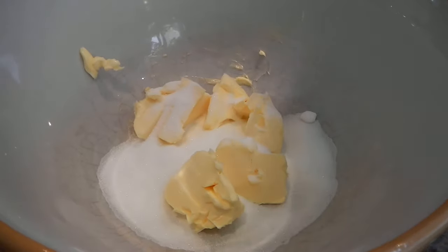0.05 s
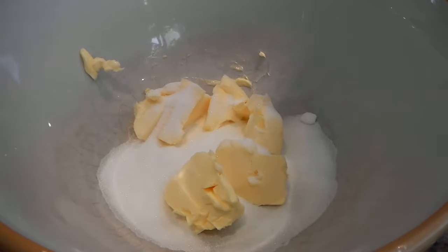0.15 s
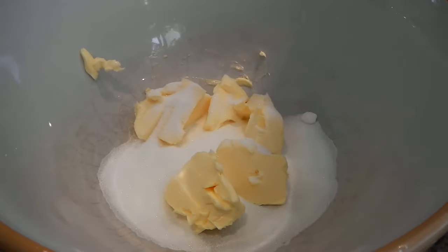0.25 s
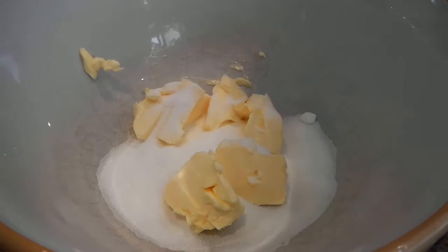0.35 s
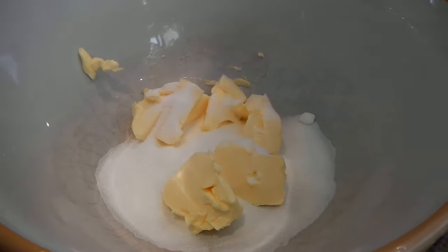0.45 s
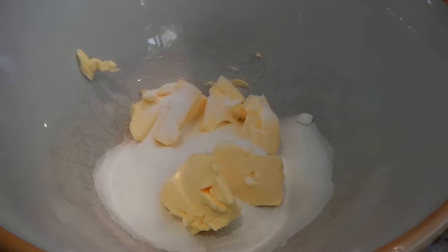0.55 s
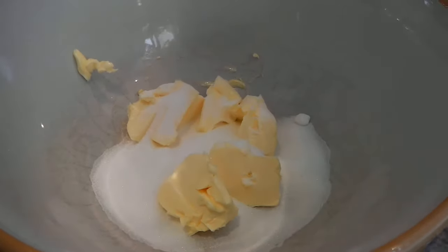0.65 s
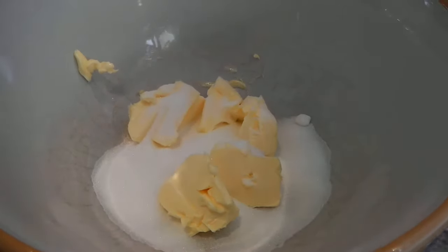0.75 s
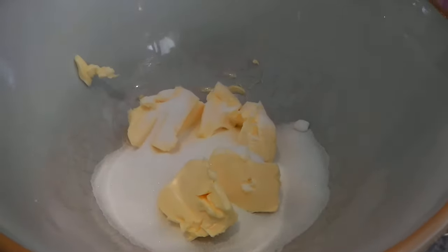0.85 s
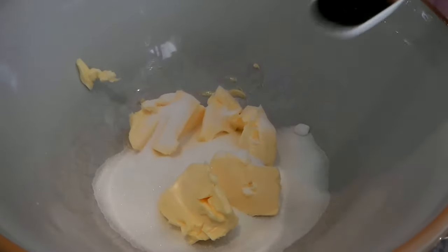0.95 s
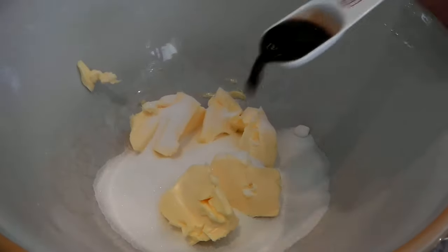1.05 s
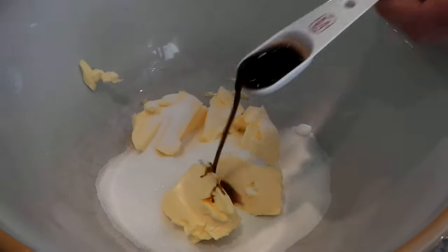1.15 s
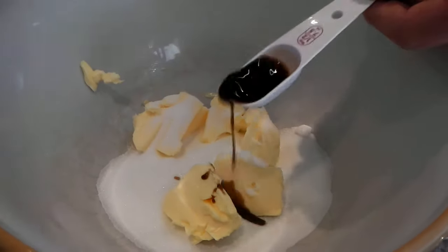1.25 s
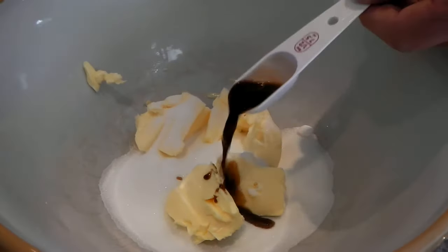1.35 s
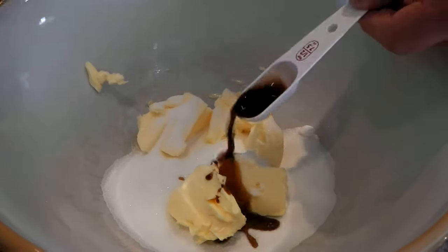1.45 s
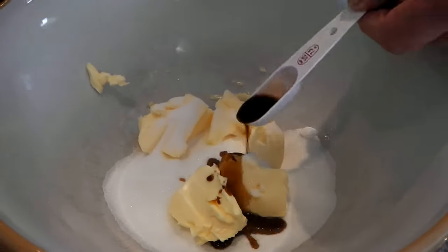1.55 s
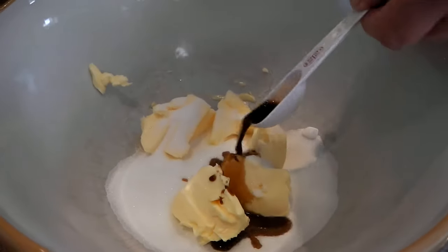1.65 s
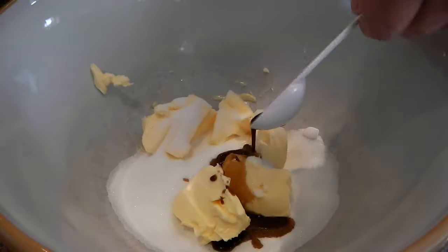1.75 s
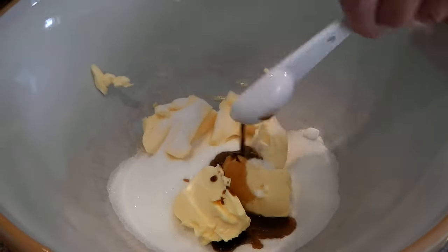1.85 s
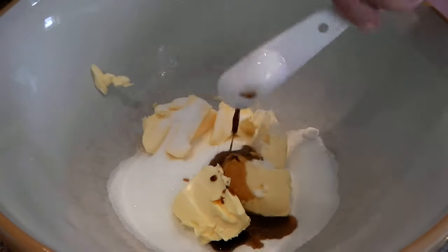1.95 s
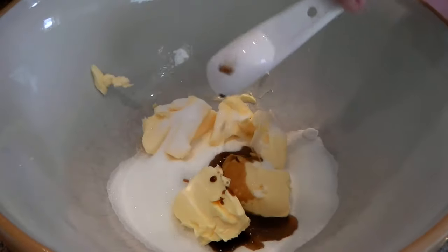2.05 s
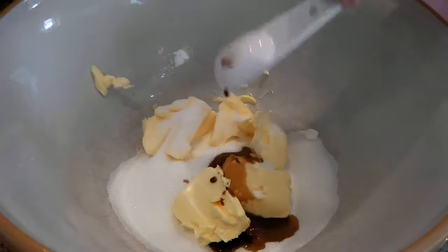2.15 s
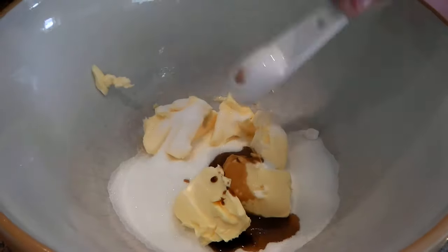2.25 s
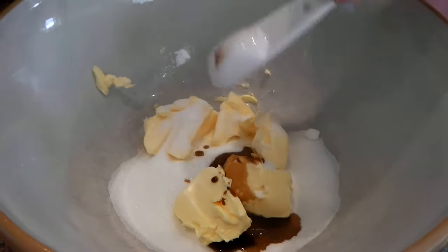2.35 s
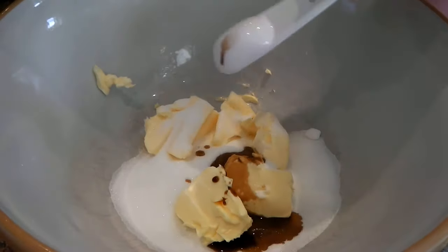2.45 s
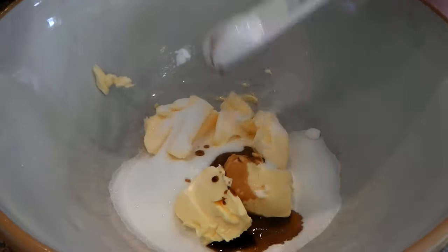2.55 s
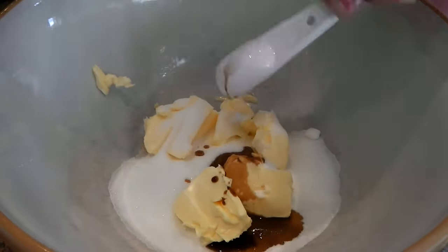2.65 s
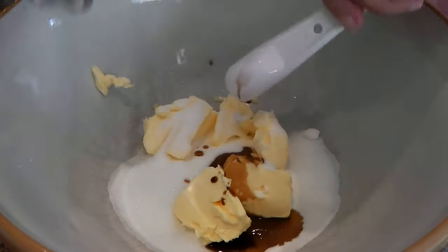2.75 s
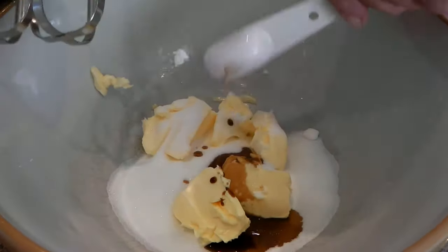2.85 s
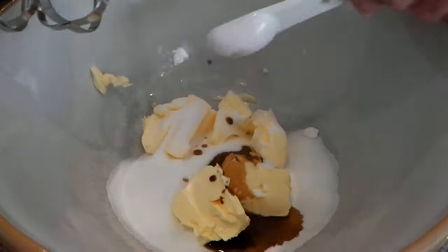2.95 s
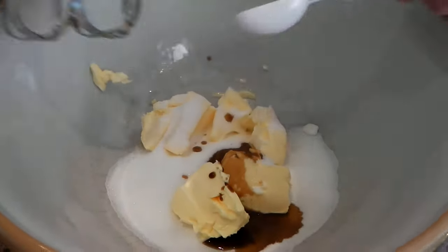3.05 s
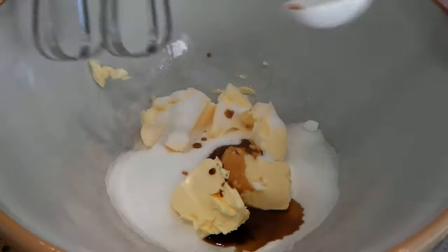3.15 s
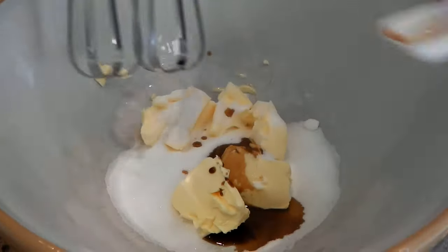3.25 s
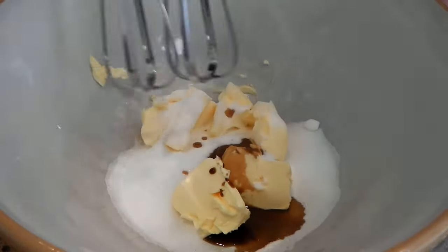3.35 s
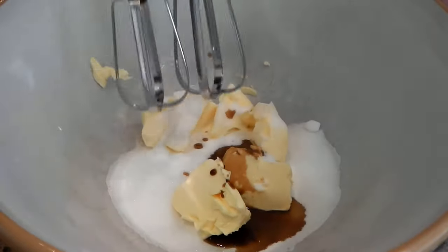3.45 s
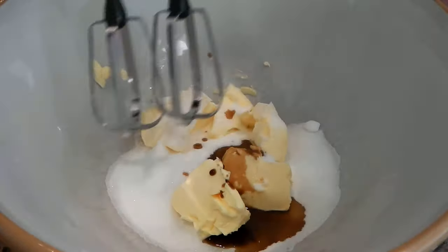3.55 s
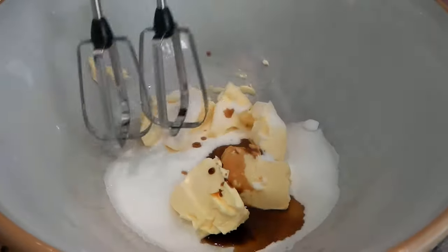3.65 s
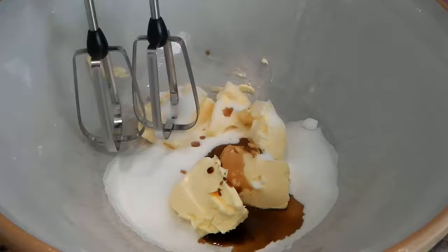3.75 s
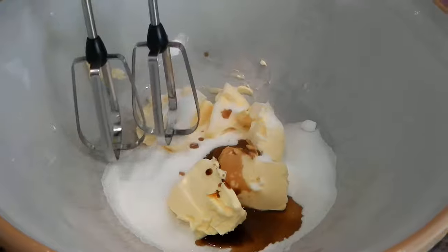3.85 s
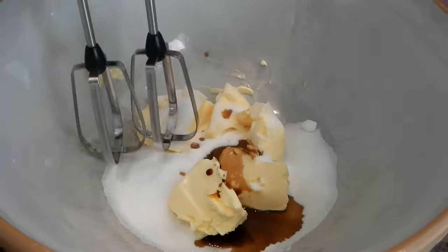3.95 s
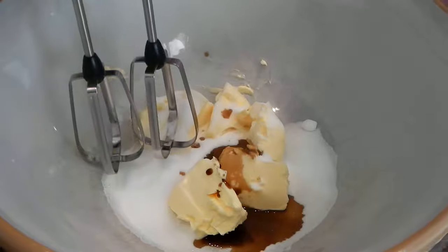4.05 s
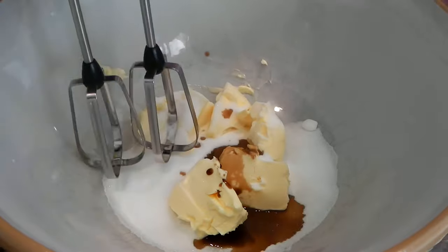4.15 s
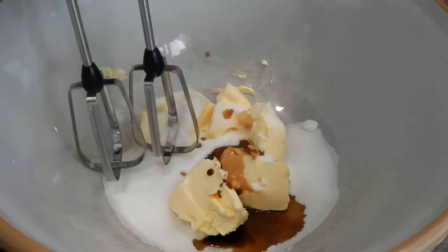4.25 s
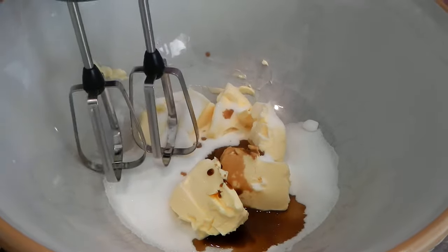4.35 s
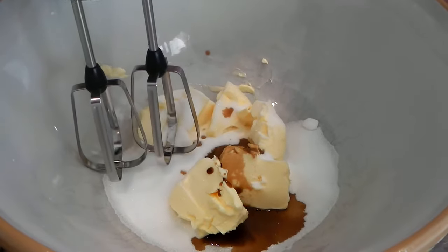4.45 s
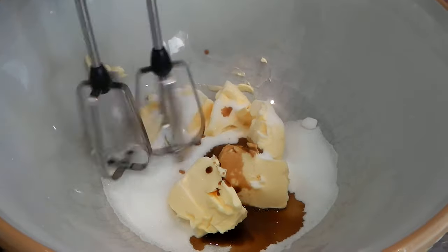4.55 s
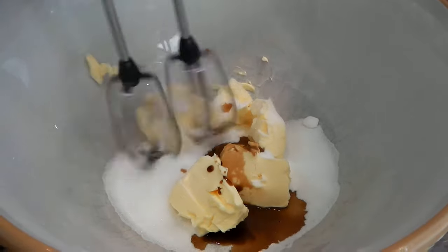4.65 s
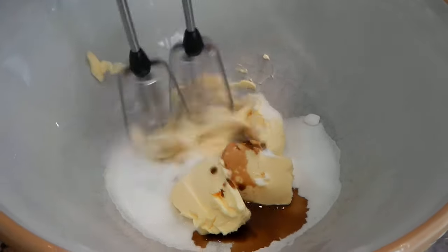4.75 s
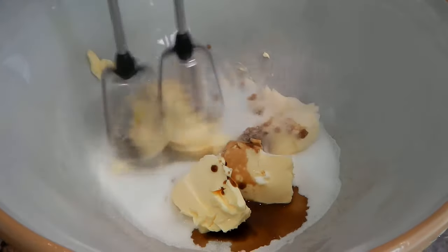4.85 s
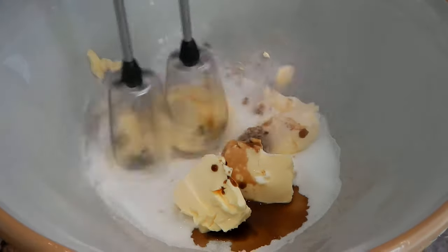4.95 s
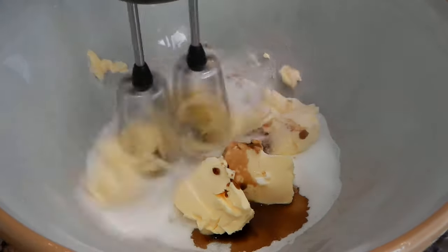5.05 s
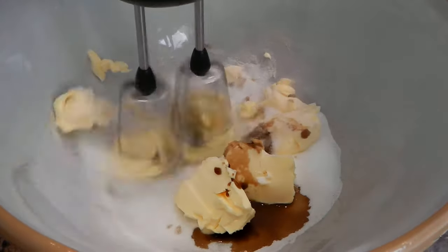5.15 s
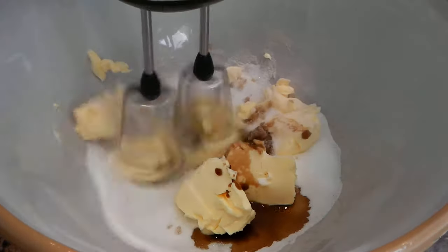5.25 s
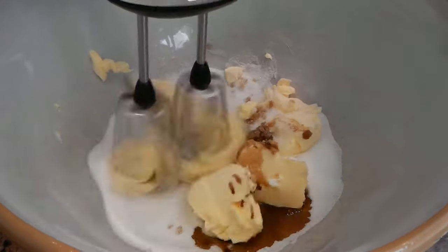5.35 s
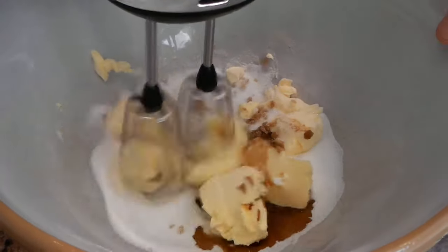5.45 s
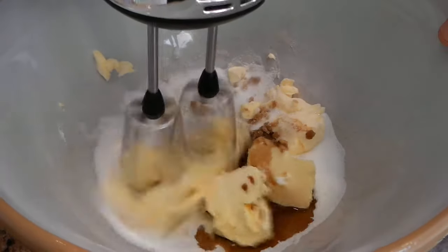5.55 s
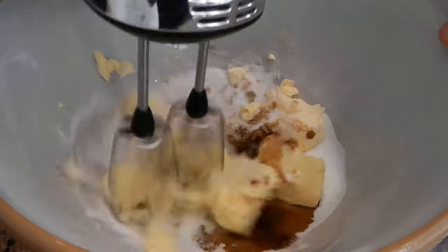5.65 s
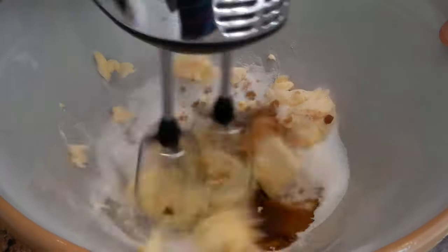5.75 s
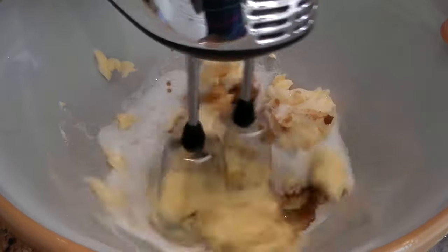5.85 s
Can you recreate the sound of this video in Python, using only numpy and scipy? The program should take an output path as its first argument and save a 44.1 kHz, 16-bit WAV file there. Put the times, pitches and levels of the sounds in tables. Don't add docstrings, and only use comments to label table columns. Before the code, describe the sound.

Light spoon taps, sleeve rustles and faint focus blips, then beaters clank in a ringing ceramic bowl before a hand mixer whines up and churns.

```python
import sys
import numpy as np
from scipy import signal
from scipy.fft import rfft, irfft, next_fast_len
from scipy.io import wavfile

SR = 44100
rng = np.random.default_rng(int(sys.argv[2]) if len(sys.argv) > 2 else 0)


def volts(x):
    e = np.asarray(x, float) / 20
    return 10 ** e


def master(y):
    cut = np.clip(np.atleast_2d(y).T, -1, 1)
    pcm = np.round(cut * 32767)
    wavfile.write(sys.argv[1], SR, pcm.astype(np.int16))


N = 260190

T = np.arange(N) / SR
RING = np.arange(12000) / SR
START = int(4.4 * SR)
SIZE = 2 ** 18
HZ = np.fft.rfftfreq(SIZE, 1 / SR)
SIDES = np.array([[.5], [-.5]])
ON_S, BREAK_FREE_S, BITE_S, OVERTONES_S = 4.47, 4.497, 4.755, 4.535
FREE_SPEED, SPEED_GAP, SPIN_UP_S = 226, 181, .2
BARS, MAINS_BEAT_HZ = 12, 100
FRAME_S, HUNT_FRAMES = 1 / 29.97, 97

# frequency in Hz, level in dB per Hz.
HOUSING_COLOUR = [(120, -49), (200, -12.5), (270, -25), (400, -9.5), (680, -8), (1100, -3), (1500, -4),
                  (1900, -9), (2400, -4.5), (3000, -6.5), (3500, -8.5), (5200, -8), (6500, -16),
                  (8000, -34), (10000, -45)]
# frequency in Hz, level in dB per Hz.
AIR_COLOUR = [(3240, -20), (5500, -6), (5930, -3.5), (7320, -7), (7970, -9), (8990, 3.5), (9980, -4),
              (10900, -2.5), (11400, -5), (12500, -6), (13800, -4), (16000, -6.5)]
# frequency in Hz, level in dB per Hz.
CHURN_COLOUR = [(20, -34.5), (45, -7.5), (82, 2), (139, -1), (172, -6.5), (254, -13), (400, -6),
                (600, -10.5), (900, -46)]
GEAR_ORDERS = 2, 3, 5, 6, 7, 9, 14, 18, 20, 28, 30, 32
GEAR_DB = [17, 19.5, 17.6, 17.6, 18.5, 24.7, 24, 20, 21, 16, 12, 11]
FAN_ORDERS = 34, 38, 40, 41, 43, 44, 47, 49, 52, 53, 55
FAN_DB = [23, 22, 17, 20, 21, 19, 18, 18, 20, 21, 19]
SIDEBANDS_DB = [-23, -3.5, 0.5, -0.5, -9.5]
OVERTONE_ORDERS = 24, 36
OVERTONE_DB = [1.6, -7]
UPPER_ORDERS = 48, 60, 72
UPPER_DB = [-5.5, -7, -3.5]
TOP_ORDERS = 84, 96
TOP_DB = [-11, -7]
# frequency in Hz, gain in dB.
VENTS = [(2000, 4), (5000, -2.5), (7000, 2.5), (9000, 4), (10600, 1), (11700, 1), (12300, -10), (13300, -7),
         (14000, 3), (15600, -1), (16200, -40)]
# frequency in Hz, likeness from -1 to 1.
SAME = [(60, 0.91), (130, 0.95), (290, 0.95), (640, 0.95), (1410, 1), (3100, 0.6), (6820, -0.023),
        (15000, -0.24)]
# frequency in Hz, likeness from -1 to 1.
MOTOR_SAME = [(60, 0.51), (130, 0.83), (290, 0.93), (640, 0.97), (1410, 0.99), (2400, 0.96), (4400, 0.63),
              (8000, 0.3), (15000, 0.5)]
# frequency in Hz, left over right in dB.
LEAN = [(60, -1), (180, 0.5), (550, -1), (1650, 0), (4970, -2), (15000, -3.5)]
# frequency in Hz, lead in radians.
LEFT_LEAD = [(1500, 0), (2670, -0.64), (4570, -0.5), (7240, 0.5), (8960, 0.9), (9600, 0.4), (11500, 3),
             (13700, 1.5), (16000, 1.5)]
# time in seconds, speed lost in turns
DRAG = [(4.62, 2.9), (4.68, 8.2), (4.73, 9.8), (4.765, 8.4), (4.85, 10.8), (4.9, 8.1), (4.97, 13.4),
        (5.03, 10.2), (5.075, 10.2), (5.13, 6.6), (5.23, 3.9), (5.47, 1.8), (5.72, 5.5), (5.78, 9.5),
        (5.84, 12), (5.9, 9)]
# peak in seconds, dB over running level, rise and 20 dB fade in seconds.
SURGES = [
    (4.47, 26.5, 0.0052, 0.0182),
    (4.501, 4, 0.092, 0.28),
    (4.54, 5, 0.59, 0.1),
]
# time in seconds, churning level in dB.
DEPTH = [
    (4.47, -54),
    (4.79, -54),
    (4.835, -37),
    (4.97, -50),
    (5.31, -39),
    (5.56, -41),
    (5.647, -31),
    (5.7, -36.5),
    (5.9, -36.5),
]
# start in seconds, peak in dB, ring in
# Hz.
CLATTER = [(4.482, -9.5, 1050), (4.493, -11, 1030), (4.501, -3.5, 1160), (4.506, -9, 1070),
           (4.513, -1.5, 1413), (4.519, -8, 1400), (4.523, 0, 1450), (4.534, -9, 1050), (4.531, -7.5, 803),
           (4.542, -7.5, 720), (4.55, -17, 1740), (4.552, -10, 4750), (4.56, -2, 1320), (4.561, -7, 2370),
           (4.572, -2, 1380), (4.583, -3, 1380), (4.596, -10, 1580), (4.613, -11, 1510), (4.742, -16, 1140),
           (4.762, -8.5, 1100), (4.812, -13, 1110), (4.86, -10, 1180), (4.895, -5, 1200), (5.012, -9, 1130),
           (5.06, -10, 1280), (5.145, -14.5, 1110)]
# start in seconds, peak in dB, ring in Hz,
# left over right in dB, treble in dB.
TAPS = [(0.8053, -21.5, 3650, 8, -15), (0.8057, -29.5, 1270, 0, -30), (1.1245, -36, 2800, -0.5, -20),
        (1.203, -38, 2760, 2, -19), (1.2316, -32, 2300, 11, -0.5), (1.258, -31, 2630, 14, -22),
        (1.4179, -30, 1310, 0, -20), (1.4314, -33.5, 1720, 1, -22), (1.4373, -33, 4000, 10, -22),
        (1.6187, -34, 1890, -1.5, -28), (1.783, -39.5, 4000, 1.0, -25.5),
        (2.5643, -43, 1430, -3.5, -20), (2.6887, -34.5, 1480, 3, -27),
        (2.7876, -40, 1130, -0.5, -19.5),
        (3.312, -43.5, 3530, 1, -20.5), (3.3728, -31, 1010, -3, -28),
               (3.3767, -21.5, 4130, -3, -27.5), (3.3833, -27, 1880, 6, -24),
               (3.385, -25.5, 6120, 3, -15.5), (3.464, -33, 2510, 1.0, -19), (3.4894, -28, 6460, -4, -10),
               (3.501, -26.5, 2570, -0.5, -27), (3.632, -36, 3270, 0, -24), (3.6386, -31, 1320, -0.5, -28),
               (3.6748, -31, 1420, 1.0, -26), (3.6744, -30.5, 3650, -1, -18),
               (3.821, -22.5, 3790, -13, -30), (3.863, -25, 4460, -10, -25), (3.9654, -25, 860, -1, -28),
               (3.973, -26, 800, -1, -34), (4.001, -27.5, 921, 0, -30), (4.0294, -29, 920, -2, -21),
               (4.045, -30.5, 800, 0, -34), (4.0598, -27.5, 2750, -2, -13), (4.0917, -34.5, 1550, 0, -24),
               (4.224, -26, 2760, -3, -4), (4.349, -30, 2160, -3.0, -38), (4.4211, -21.5, 5040, -16, -34),
               (4.4682, -16, 1290, 2, -21)]
# start in seconds, peak in dB.
TICKS = [(1.095, -45), (1.215, -44), (1.228, -49), (1.24, -47), (1.252, -47), (1.265, -48.5), (1.29, -58),
         (1.33, -43), (1.345, -53), (3.3845, -50.5), (3.635, -46.5), (3.675, -53.5), (3.82, -32),
         (3.829, -38), (3.864, -40), (3.92, -54), (4.223, -46), (4.243, -50), (4.421, -43), (4.436, -47.5)]
# start in seconds, peak in dB.
CLANKS = [
    (3.8209, -11),
    (3.8286, -24),
    (3.8308, -29),
]
# frequency in Hz, level in dB, time to fade 60 dB in seconds.
WIRE = [(1320, -15, 0.017), (3270, -11, 0.019), (3850, -3, 0.013), (4100, -2, 0.0099), (4310, -7, 0.018),
        (5270, -17, .014), (6200, -41.5, .012)]
# start in seconds, peak in dB, contact in seconds,
# factor on the ringing time, best excited frequency in Hz.
TOUCHES = [
    (3.818, -40, 0.034, 0.88, 1300),
    (3.859, -34, 0.0056, 0.95, 1700),
    (4.222, -25, 0.013, 0.4, 5200),
    (4.239, -24.5, 0.027, 0.23, 2540),
    (4.341, -41, 0.012, 0.2, 2220),
    (4.345, -39, 0.0104, 0.21, 2280),
    (4.355, -33, .012, 0.11, 3300),
    (4.422, -18.5, 0.028, 0.21, 4200),
]
# frequency in Hz, level in dB, time to fade 60 dB in seconds.
BOWL = [(786, -8, 0.49), (1800, -29, 0.68), (2210, -1, 0.49), (2270, -8, 0.15), (2760, -17.5, 0.1),
        (3850, -17, 0.25), (4010, -10.5, 0.26), (4450, -11.5, 0.2), (4470, -16, 0.15), (5040, 0.5, 0.11),
        (5370, -8, 0.21), (5470, -17, 0.13), (6200, -16, 0.12), (7050, -19, 0.089)]
# start in seconds, peak in dB, Hz, 60 dB fade in seconds.
HUMS = [
    (3.823, -47, 2220, 0.64),
    (4.243, -48, 1766, 0.28),
    (4.4213, -29, 5056, .2),
    (4.4215, -32, 2270, .12),
    (3.86, -45, 790, .3),
    (4.247, -45, 787, .19),
    (4.345, -43, 2230, .1),
]
# frequency in Hz, level in dB, time to fade 60 dB in seconds.
STEM = [(2750, 2.5, 0.041), (5600, -4, 0.082), (6460, -10, .06), (7090, -5.5, 0.075)]
# start in seconds, peak in dB.
STEM_TINK = [
    (4.224, -28.5),
]
# frequency in Hz, level in dB, time to fade 60 dB in seconds.
WIRE_TINK = [(5480, 0.5, 0.057), (3628, -1, 0.052)]
# start in seconds, peak in dB.
CHINK = [
    (1.125, -63),
    (1.134, -57),
    (1.168, -60),
]
# frequency in Hz, level in dB, time to fade 60 dB in seconds.
GLASS = [(2790, 1, 0.26), (4000, -6, .2), (4900, 1, 0.35), (5604, 3, 0.33)]
# peak in seconds, rustle in dB, low scrape in dB,
# rise in seconds, 20 dB fade in seconds.
MOVES = [(.83, -53, -57, .02, 0.15), (1.07, -60, -78, 0.072, -0.5), (1.131, -46, -44.5, 0.006, -0.29),
         (1.256, -45.5, -50.5, 0.16, 0.26), (1.433, -47.5, -55, 0.032, 0.18),
         (1.625, -56.5, -64, 0.019, 0.54), (2.29, -67, -69, 0.011, 1), (2.58, -50, -69, 0.019, 0.13),
         (2.69, -70, -68, 0.019, 0), (2.84, -55, -73, 0.04, 0), (2.96, -53, -61, 0.036, 0.07),
         (3.05, -57, -73.5, 0.16, 0.2), (3.27, -54, -56.5, 0.051, 1), (3.38, -43.5, -50.5, 0.016, -0.02),
         (3.51, -63, -69, 0.19, -1.5), (3.639, -62, -81.5, 0.025, 0.5), (3.846, -45, -37, 0.026, 0.09),
         (3.969, -72, -39, 0.004, 0.19), (4.057, -50.5, -40.5, 0.096, 0.05), (4.25, -41, -47, 0.034, 0.01),
         (4.301, -70, -46.5, 0.085, 0.1), (4.352, -57, -43.5, 0.053, 0.1)]
# peak in seconds, level in dB, rise and 20 dB fade in seconds.
SWISHES = [
    (1.27, -66, .05, -0.5),
    (1.5, -50.5, 0.09, 0.2),
    (1.621, -46.5, 0.019, 0.25),
    (1.92, -60, 0.056, 0.5),
    (2.3, -63, 0.064, .2),
    (2.58, -58, .03, 0),
    (2.99, -52.5, .08, 0.3),
    (3.395, -45.5, .03, 0.15),
]
# frequency in Hz, level in dB per Hz.
RUSTLE = [(500, -9.5), (900, -7.5), (2000, -4), (3400, -9), (5800, -11.5), (8000, -21), (11000, -22),
          (16000, -32)]
# frequency in Hz, level in dB per Hz.
SWISH = [(600, -13.5), (1200, -2.5), (2000, -1), (3000, -10.5), (5000, -15), (8000, -45)]
# frequency in Hz, level in dB per Hz.
SCRAPE = [(300, -18.5), (550, 0.5), (780, 3.0), (1000, -7.5), (2500, -39)]
# start in seconds, peak in dB, frequency in Hz.
THUMPS = [
    (0.929, -52, 61.9),
    (0.942, -39, 111),
    (1.262, -34.5, 142),
    (1.289, -38, 130),
    (1.339, -52, 64.6),
    (2.076, -53, 61.9),
    (3.953, -49, 123),
    (4.469, -45, 195),
    (4.819, -35, 78),
]
# start in seconds, peak in dB.
FOCUS = [(1.247, -35), (1.279, -31.5), (1.345, -33.5), (1.413, -37.5), (1.446, -31), (1.514, -31.5),
         (1.612, -40), (1.847, -37.5), (1.88, -37.5), (1.978, -37), (2.079, -31.5), (2.146, -42),
         (2.546, -42.5), (2.614, -39), (2.647, -40.5), (2.711, -42), (2.814, -30), (2.847, -39.5),
         (3.315, -34.5), (3.347, -38), (3.381, -35), (3.415, -31), (3.581, -41.5), (3.614, -38.5),
         (3.646, -39.5), (3.716, -33.5), (3.747, -40.5), (4.147, -32.5), (4.312, -40), (4.382, -30),
         (1.547, -42), (1.646, -44), (1.78, -60), (1.914, -47), (1.947, -44), (2.014, -45), (2.047, -48),
         (2.114, -45), (2.215, -65), (2.314, -60), (2.413, -43.5), (2.447, -58), (2.681, -45), (2.916, -60),
         (3.148, -58), (3.449, -46.5), (3.681, -58), (3.817, -34.5), (3.982, -49), (4.281, -45)]
# frequency in Hz, level in dB per Hz.
QUIET = [(15, -36), (40, -13), (90, -3), (250, -7.5), (450, 0.5), (800, -4), (1600, -8.5), (4000, -11.5),
         (6500, -14.5), (7850, -21.5), (9000, -15), (10500, -25.5), (15500, -24.5), (15800, -70)]
# frequency in Hz, likeness from -1 to 1.
QUIET_SAME = [(60, 0.87), (240, -0.25), (950, -0.33), (3770, -0.43), (15000, -0.18)]
# frequency in Hz, gain in dB.
GAP = [(7550, 0), (7720, -9), (7810, -30), (7900, -36), (7950, -14), (8300, -1.5), (15500, -0.5), (15800, -60)]


def mixer():
    t, size = T[START:], N - START
    speed = shaft_speed()[START:]
    angle = 2 * np.pi * np.cumsum(speed * (1 + 0.00083 * drift(31))) / SR
    beat = 2 * np.pi * MAINS_BEAT_HZ * (t - 4.503)
    throb = np.clip(1.6 - speed / 112, 0.03, 0.55) * np.cos(beat)
    loaded = ((t - BITE_S) / .12).clip(.25, 1)
    churn = colour(pair(SAME, size), CHURN_COLOUR) * volts(1.5 * drift(18))
    parts = (brushes_and_gears(angle, throb, loaded), fan_air(angle, throb, loaded), churn,
             commutator_whine(angle, beat, speed), whine_overtones(angle, beat, speed))
    *broad, tones = (evened(x) * gain[START:] for x, gain in zip(parts, levels()))
    sound = np.zeros((2, N))
    sound[:, START:] = sum(broad)
    beater_clatter(sound)
    placing = volts(read(LEAN, HZ) * SIDES) * np.exp(1j * read(LEFT_LEAD, HZ) * SIDES)
    sound = irfft(rfft(sound, SIZE) * placing)[:, :N]
    add(sound, START / SR, tones, pan_db=-2.0)
    return sound


def shaft_speed():
    return FREE_SPEED - SPEED_GAP * np.exp(-(T - ON_S).clip(0) / SPIN_UP_S) - curve(DRAG)


def levels():
    share = shaft_speed() / FREE_SPEED
    surge = sum(swell(*row) for row in SURGES)
    on = ((T - ON_S + 0.005) / 0.0057).clip(0, 1)
    free = .22 + .78 * ((T - BREAK_FREE_S) / .006).clip(0, 1)
    before_bite = ((BITE_S - T) / 0.0079).clip(0, 1)
    brush = free * (volts(-(1 - share) - 4 * before_bite) + surge)
    brush = brush * volts(-23.5 - 10 * np.exp(-(T - 4.5).clip(0) / 0.25))
    air = free ** 1.15 * (volts(-30 * (1 - share)) + volts(-10) * surge) * volts(-22)
    churn = volts(curve(DEPTH) + 2.0)
    whine = ((T - ON_S - .02) / 0.045).clip(0, 1) * volts(-17.5 - 11 * (1 - share ** 8.1))
    overtones = ((T - OVERTONES_S) / 0.021).clip(0, 1) * volts(-28.5 + 2.5 * (1 - share))
    return on * np.array([brush, air, churn, whine, overtones])


def brushes_and_gears(angle, throb, loaded):
    sparks = pair(MOTOR_SAME, N - START) * (1 + throb) * volts(0.59 * drift(40.0))
    return colour(sparks + loaded * lines(angle, GEAR_ORDERS, GEAR_DB, waver_db=2.0), HOUSING_COLOUR)


def fan_air(angle, throb, loaded):
    gusts = pair(MOTOR_SAME, N - START) * (1 + 0.088 * np.cos(angle) + 0.84 * throb) * volts(0.55 * drift(40))
    return colour(gusts + loaded * lines(angle, FAN_ORDERS, FAN_DB, waver_db=3.5), AIR_COLOUR)


def commutator_whine(angle, beat, speed):
    whine = 0
    for k, db in enumerate(SIDEBANDS_DB):
        apart = 0.53 * (speed / FREE_SPEED) ** 3 * (-1) ** k * np.array([[1], [-1]])
        phase = BARS * angle + (k - 2) * beat + rng.uniform(0, 5.6, 1) + apart
        whine = whine + volts(db + 3.2 * drift(13)) * np.cos(phase)
    fuzz = signal.lfilter(*signal.butter(2, 330, fs=SR), pair([(20, 0.87), (9000, 1.0)], N - START))
    return evened(whine) + volts(-7.0) * evened(fuzz * np.cos(BARS * angle))


def whine_overtones(angle, beat, speed):
    jerky = angle + 0.011 * np.sin(beat)
    upper = lines(jerky, UPPER_ORDERS, UPPER_DB, waver_db=2.0, waver_hz=21.8, apart=1.0) * (speed / 215) ** 2.6
    top = sum(volts(db) * np.cos(k * jerky) for k, db in zip(TOP_ORDERS, TOP_DB)) * np.sqrt(4 / SR)
    lower = lines(jerky, OVERTONE_ORDERS, OVERTONE_DB, waver_db=3.0, waver_hz=29.8, apart=1.2)
    pulse = 1 + 0.38 * np.cos(beat) + 0.19 * np.cos(2 * beat)
    return colour((lower + upper + top) * pulse, VENTS)


def beater_clatter(sound):
    for s, db, hz in CLATTER:
        knock = ring([(hz, 0, .025), (1050, -6, .025), (2350, -7, .025), (4900, -8, .015)])
        add(sound, s, volts(db - 8.0) * knock * np.minimum(RING / 0.0015, 1))


def lines(angle, orders, levels_db, waver_db, waver_hz=12.6, apart=2.4):
    out = 0
    for k, db in zip(orders, levels_db):
        offset = np.array([[0], [1]]) * np.tanh(rng.normal()) * min((k / 16) ** 2, apart)
        start = 2 * np.pi * rng.random() + offset
        level = volts(db + waver_db * drift(waver_hz))
        out = out + level * np.cos(k * angle + start + 0.45 * drift(waver_hz))
    return out * np.sqrt(4 / SR)


def taps():
    out, t = np.zeros((2, N)), RING
    for s, db, hz, pan_db, treble_db in TAPS:
        fade = volts(-60 * t / 0.014) + 0.19 * volts(-60 * t / 0.1)
        crack = rng.standard_normal((2, len(t))) * fade
        wide = low_pass(high_pass(crack[0], hz / 2.15), min(hz * 1.53, 12000))
        top = high_pass(crack, 5900)
        sound = wide / abs(wide).max() + .3 * ring([(hz, 0, .03)])
        treble = volts(treble_db + 5.5) * top / abs(top).max()
        add(out, s, volts(db - 3.0) * (sound + treble), pan_db)
    for s, db in TICKS:
        add(out, s, volts(db + 2.5 - 60 * t / 0.024) * high_pass(rng.standard_normal((2, len(t))), 8700))
    for s, db in CLANKS:
        add(out, s, volts(db) * low_pass(high_pass(ring(WIRE), 690), 7460)[None], pan_db=-3.5)
    return out


def rings():
    out = np.zeros((2, N))
    for s, db, length, damping, spot_hz in TOUCHES:
        count = min(1 + int(length * SR), 2400)
        chatter = rng.standard_normal((2, count)) * np.array([[1], [.6]])
        chatter *= rng.random((2, count)) < .15
        chatter[0, 0] = 1.8
        modes = [(hz, level_db - 5.5 * abs(np.log2(hz / spot_hz)), t60) for hz, level_db, t60 in BOWL]
        sound = signal.fftconvolve([chatter[0], chatter[0] + chatter[1]], ring(modes, damping)[None], axes=1)
        add(out, s, volts(db) * low_pass(sound, 7800) / abs(sound).max(), pan_db=-1.0)
    for s, db in STEM_TINK:
        add(out, s, volts(db) * ring(STEM)[None] * np.minimum(RING / 0.0018, 1))
    add(out, 3.864, volts(-34.5) * ring(WIRE_TINK)[None])
    for s, db, hz, t60 in HUMS:
        add(out, s, volts(db) * ring([(hz, 0, t60)])[None] * np.minimum(RING / .001, 1))
    for s, db in CHINK:
        add(out, s, volts(db) * ring(GLASS)[None])
    return out


def hands():
    grain = volts(2.3 * drift(160, size=N))
    rustle = evened(colour(pair(SAME) * grain, RUSTLE))
    scrape = evened(colour(pair(SAME) * grain, SCRAPE))
    swish = evened(colour(pair(SAME) * grain, SWISH)) * sum(swell(*row) for row in SWISHES)
    busy = volts(-73) * (T > 2.1) * (T < 3.4)
    bright = sum(swell(s, db, rise, fade) for s, db, _, rise, fade in MOVES)
    dull = sum(swell(s, db, rise, fade) for s, _, db, rise, fade in MOVES)
    return swish + rustle * (bright + busy) + scrape * (dull + .5 * busy)


def thumps():
    out = np.zeros((2, N))
    for s, db, hz in THUMPS:
        t = T[:int(2.7 * SR / hz)]
        burst = np.hanning(len(t)) * np.sin(2 * np.pi * hz * t)
        add(out, s - 0.25 * t[-1], volts(db - 2.0) * burst[None], pan_db=4.0)
    return out


def focus():
    out, t = np.zeros((2, N)), RING[:2400]
    shape = np.exp(-((t - .008) / 0.0059) ** 2) + 0.16 * np.exp(-((t - .022) / 0.0096) ** 2)
    frame = np.arange(HUNT_FRAMES)
    faint_db = -50.5 + rng.uniform(-1.04, 1, HUNT_FRAMES) + 8 * (frame >= 77)
    listed_s = np.array(FOCUS)[:, 0]
    hunt = [(s, db) for s, db in zip(1.2463 + FRAME_S * frame, faint_db)
            if abs(s - listed_s).min() > FRAME_S / 2]
    for (s, db), hz in zip(FOCUS + hunt, rng.uniform(400.0, 440.6, 2 * HUNT_FRAMES)):
        add(out, s - .004, volts(db - 0.5) * shape * np.sin(2 * np.pi * hz * t)[None], pan_db=-7.5)
    return out


def kitchen(x):
    t = T[:SR // 2]
    hits = rng.choice([-1., 1.], (2, len(t))) * (rng.random((2, len(t))) < .06) * (t > .004)
    dull = signal.lfilter(*signal.butter(1, 3000, fs=SR), hits)
    tail = dull * volts(-60 * t / 0.33) + (hits - dull) * volts(-60 * t / 0.22)
    return signal.fftconvolve(x, tail / np.linalg.norm(tail[0]), axes=1)[:, :N]


def room_hush():
    return volts(-52) * evened(colour(pair(QUIET_SAME), QUIET))


def ring(modes, damping=1):
    return sum(volts(db - 60 * RING / (t60 * damping)) * np.sin(2 * np.pi * hz * RING) for hz, db, t60 in modes)


def swell(s, db, rise, fade):
    return volts(db - 20 * np.maximum((s - T) / max(rise, .002), (T - s) / max(fade, .002)).clip(0, 8))


def drift(hz, size=N - START):
    return evened(signal.lfilter(*signal.butter(2, hz, fs=SR), rng.standard_normal(size)))


def pair(same, size=N):
    noise = rng.standard_normal((2, size))
    length, hz = bins(noise)
    a, b = rfft(noise, length)
    c = np.clip(read(same, hz), -1, 1)
    return evened(irfft([a, c * a + np.sqrt(1 - c ** 2) * b])[:, :size])


def add(mix, s, sound, pan_db=0):
    part = mix[:, round(s * SR):][:, :sound.shape[-1]]
    part += (sound * volts(SIDES * pan_db))[:, :part.shape[1]]


def colour(x, points):
    size, hz = bins(x)
    return irfft(rfft(x, size) * volts(read(points, hz)))[..., :x.shape[-1]]


def bins(x):
    size = next_fast_len(x.shape[-1] + 1900, True)
    size += size % 2
    return size, np.fft.rfftfreq(size, 1 / SR)


def read(points, hz):
    f, value = np.transpose(points)
    return np.interp(np.log(hz + 1), np.log(f + 1), value)


def curve(rows):
    return np.interp(T, *np.transpose(rows))


def evened(x):
    return x / np.sqrt(np.mean(x ** 2) + 1e-20)


def high_pass(x, hz):
    b, a = signal.butter(2, hz, "high", fs=SR)
    return signal.lfilter(b, a, signal.lfilter(b, a, x))


def low_pass(x, hz):
    b, a = signal.butter(2, hz, fs=SR)
    return signal.lfilter(b, a, signal.lfilter(b, a, x))


def scene():
    hits = taps() + rings()
    return hits + volts(-8.0) * kitchen(hits) + focus() + thumps() + hands() + mixer()


def top_cut(x):
    return signal.sosfilt(signal.butter(12, 16570, fs=SR, output="sos"), x)


def record(dry):
    return top_cut(colour(dry, GAP) + room_hush())


dry = scene()
out = record(dry)
master(out)
```